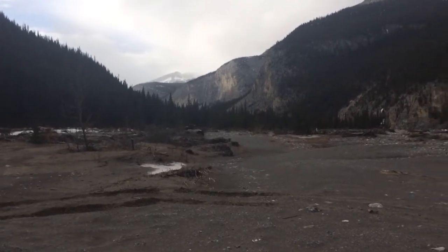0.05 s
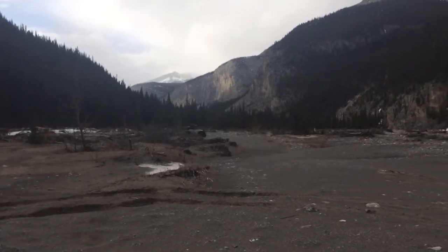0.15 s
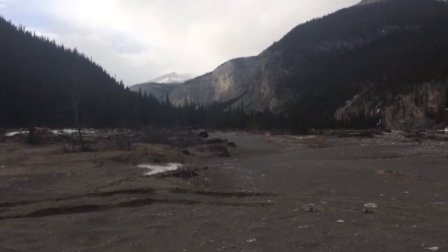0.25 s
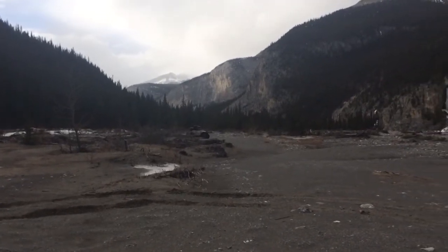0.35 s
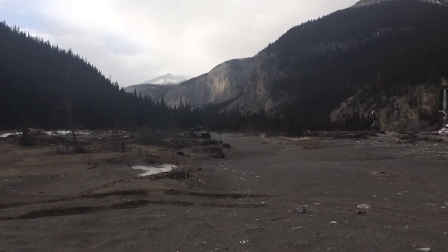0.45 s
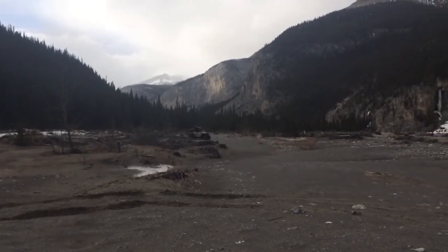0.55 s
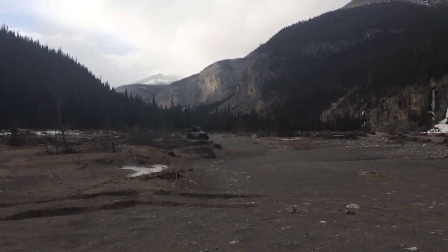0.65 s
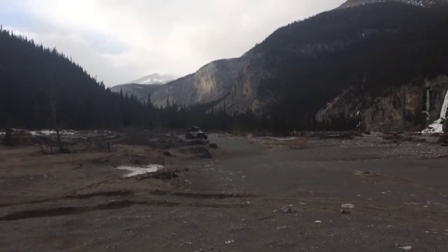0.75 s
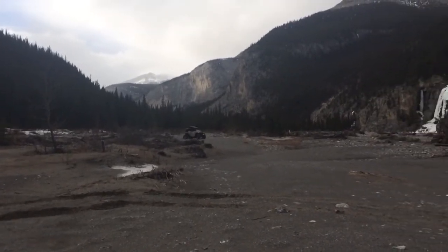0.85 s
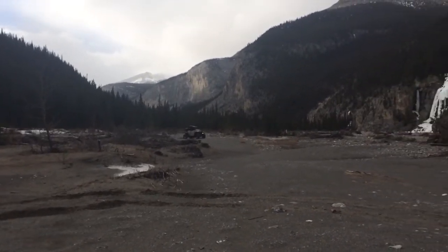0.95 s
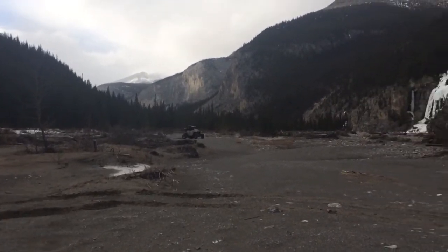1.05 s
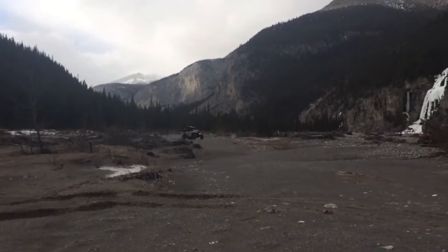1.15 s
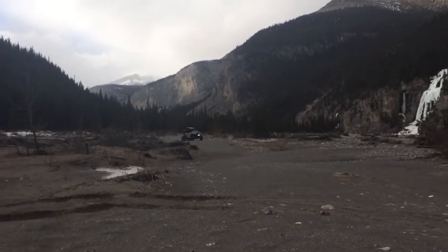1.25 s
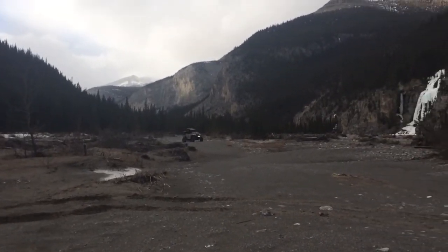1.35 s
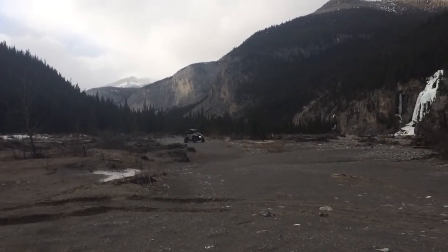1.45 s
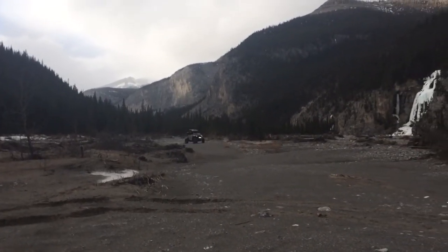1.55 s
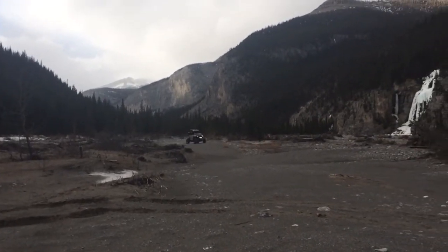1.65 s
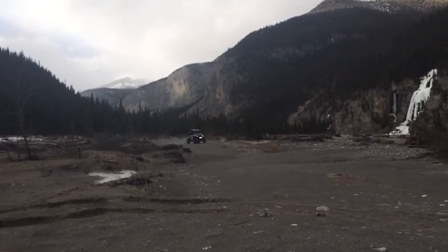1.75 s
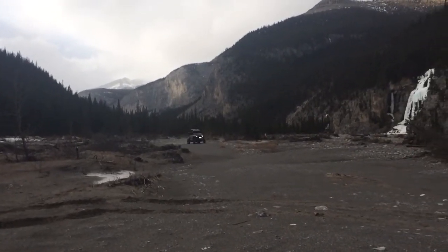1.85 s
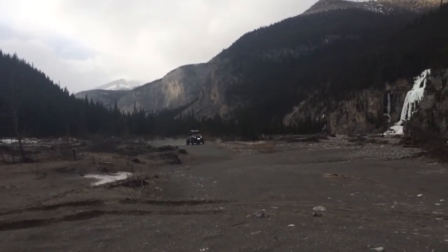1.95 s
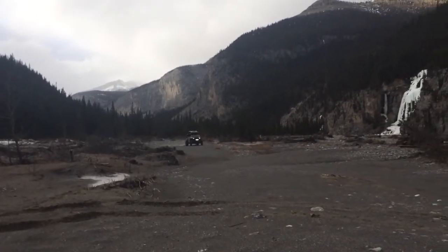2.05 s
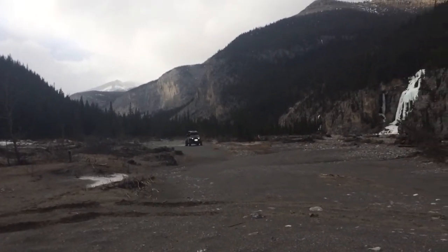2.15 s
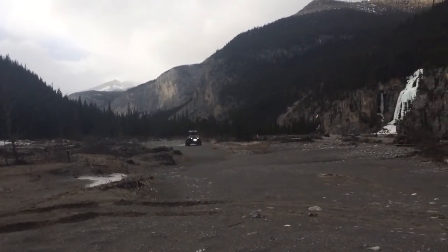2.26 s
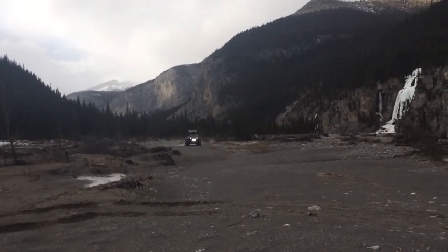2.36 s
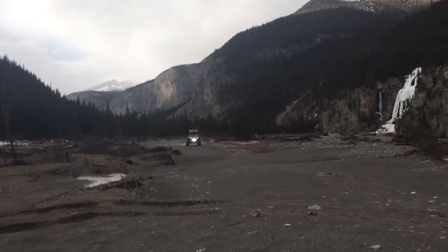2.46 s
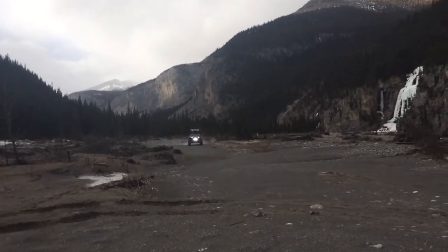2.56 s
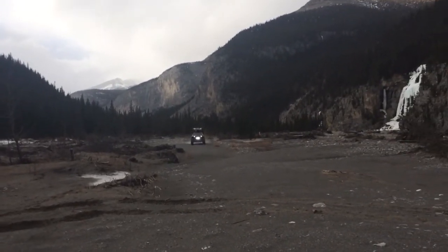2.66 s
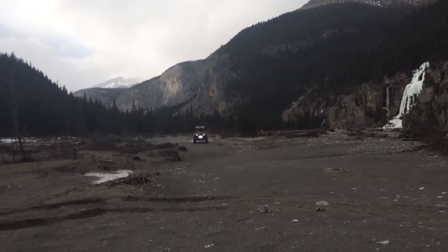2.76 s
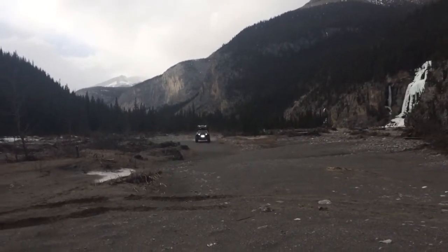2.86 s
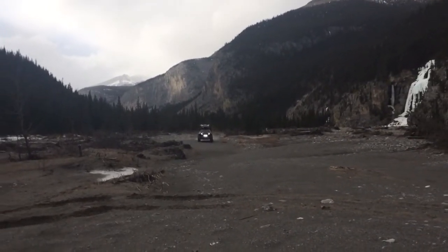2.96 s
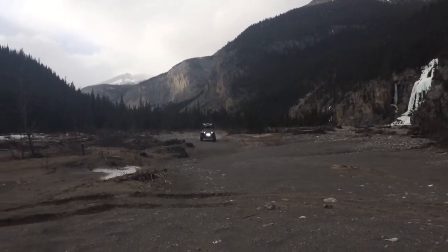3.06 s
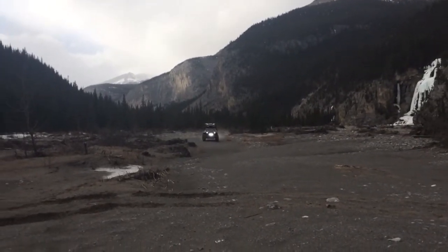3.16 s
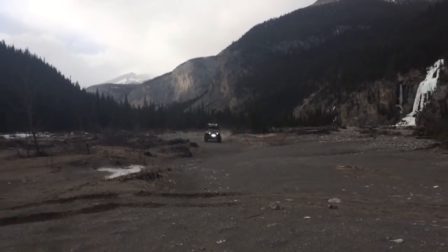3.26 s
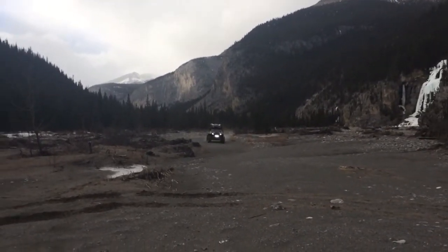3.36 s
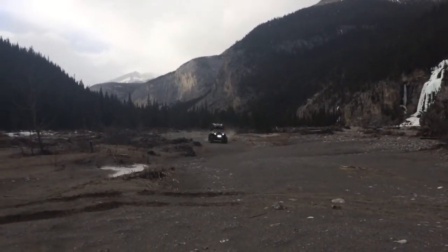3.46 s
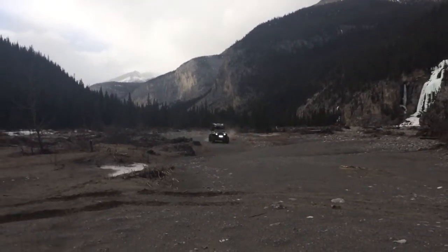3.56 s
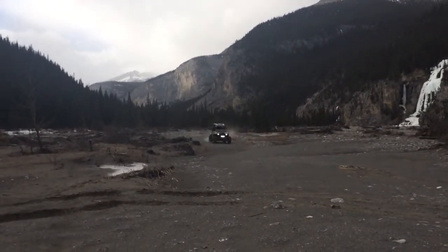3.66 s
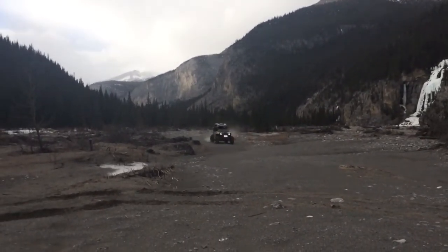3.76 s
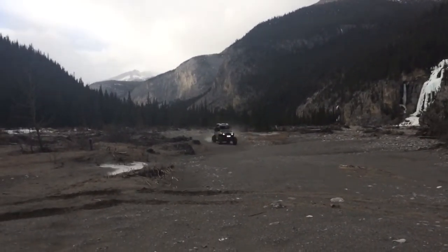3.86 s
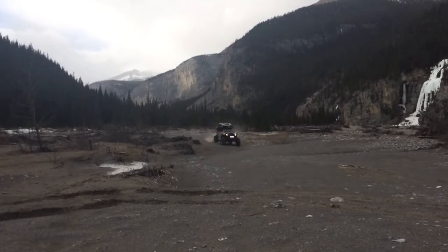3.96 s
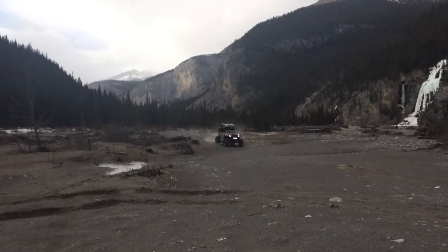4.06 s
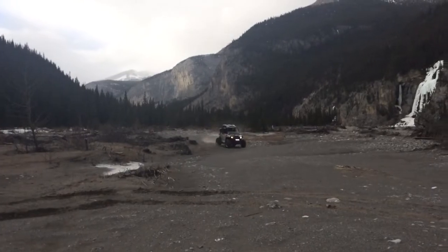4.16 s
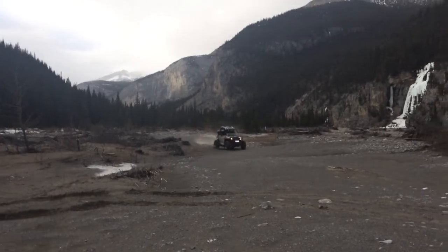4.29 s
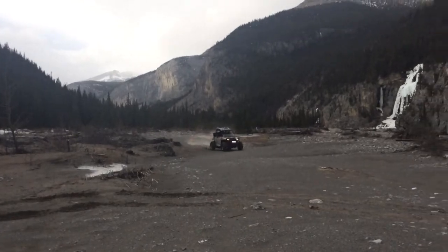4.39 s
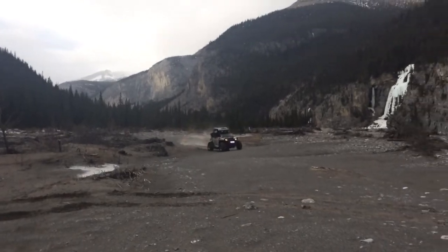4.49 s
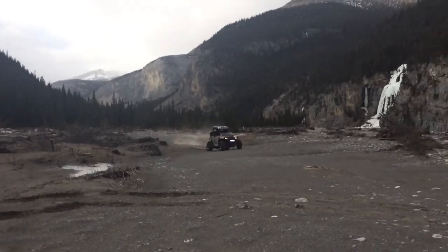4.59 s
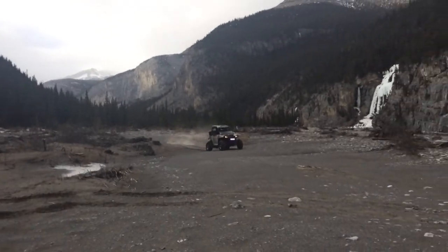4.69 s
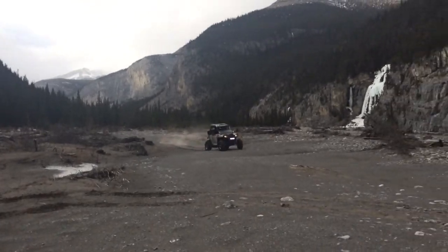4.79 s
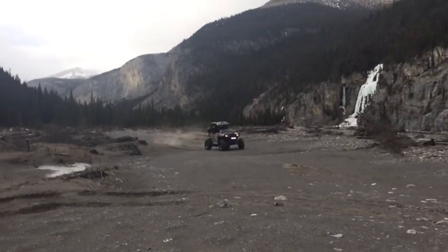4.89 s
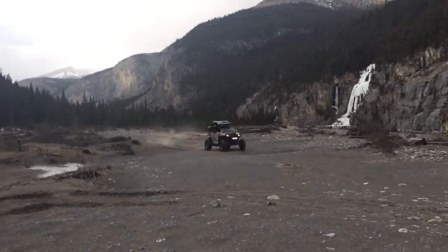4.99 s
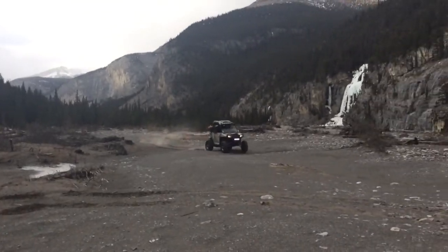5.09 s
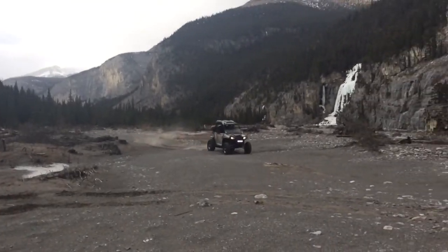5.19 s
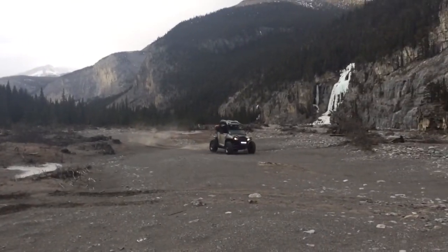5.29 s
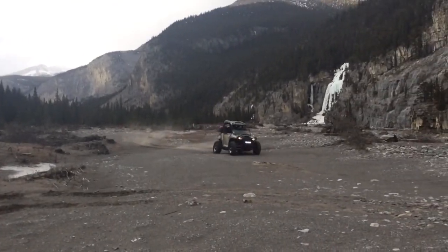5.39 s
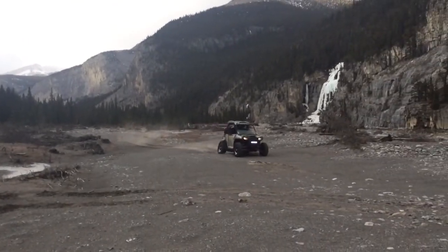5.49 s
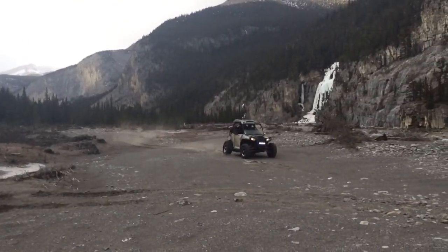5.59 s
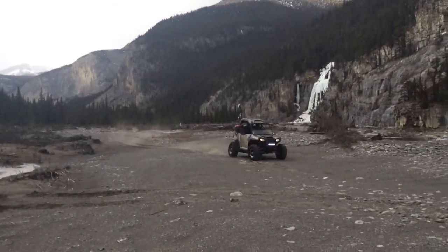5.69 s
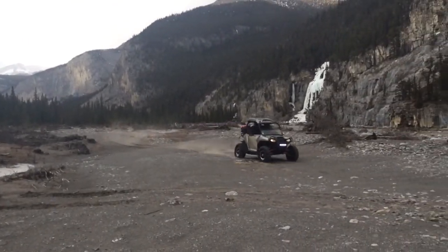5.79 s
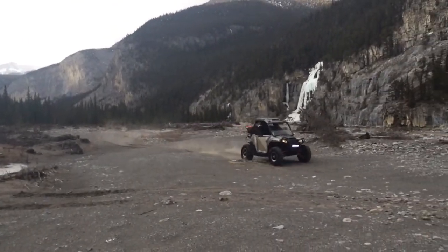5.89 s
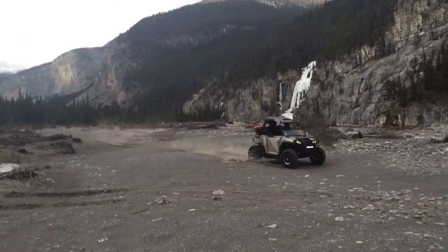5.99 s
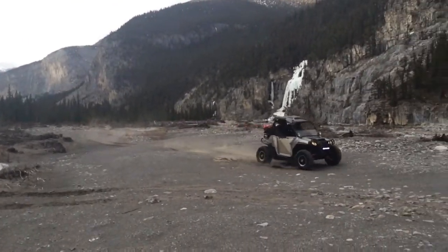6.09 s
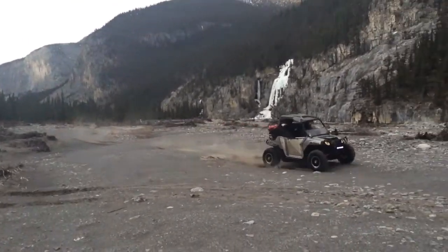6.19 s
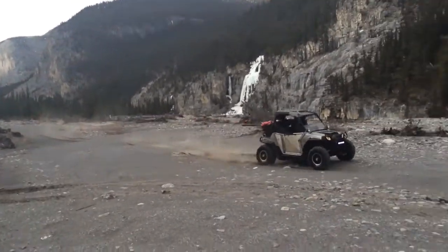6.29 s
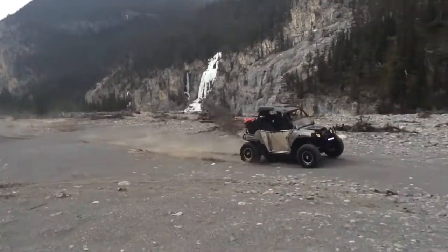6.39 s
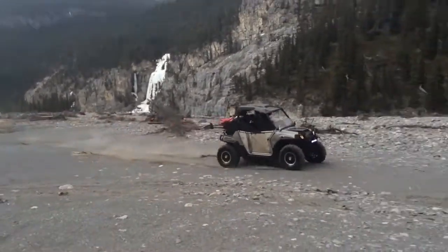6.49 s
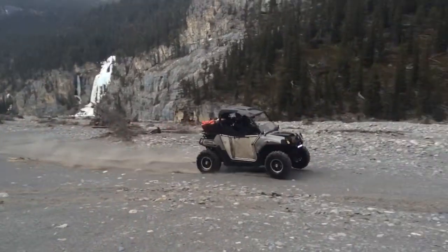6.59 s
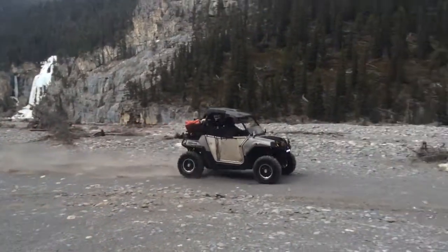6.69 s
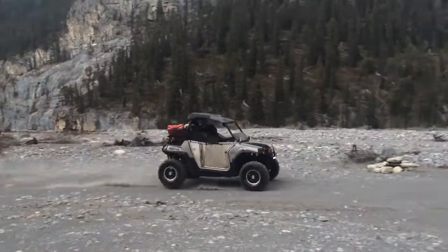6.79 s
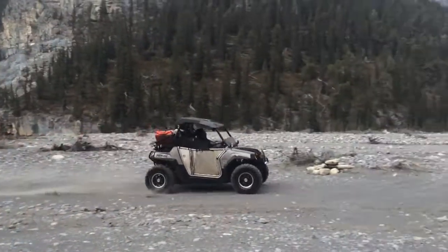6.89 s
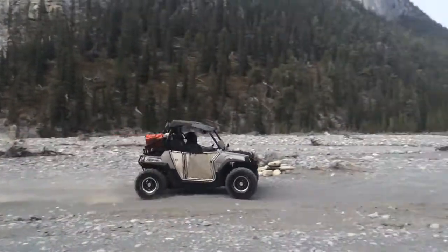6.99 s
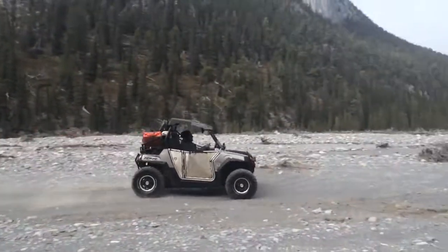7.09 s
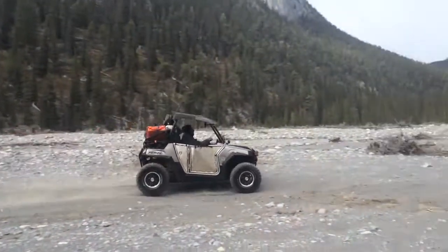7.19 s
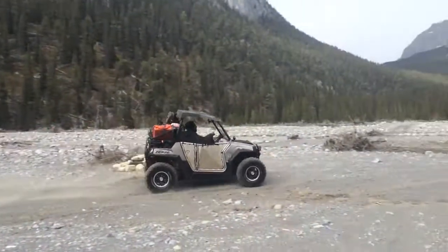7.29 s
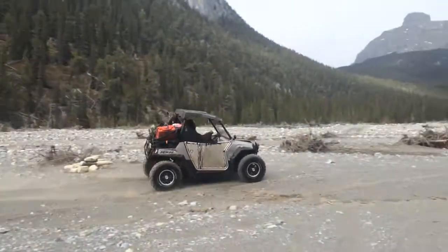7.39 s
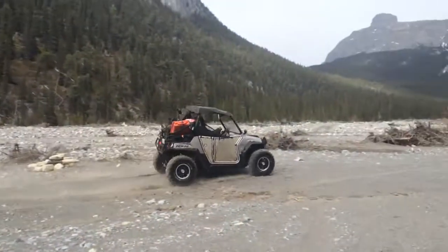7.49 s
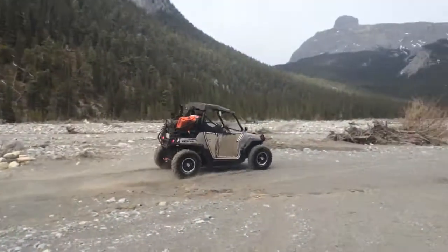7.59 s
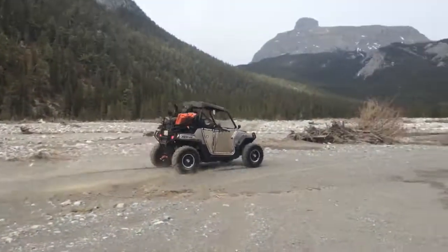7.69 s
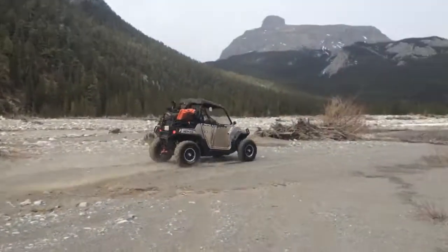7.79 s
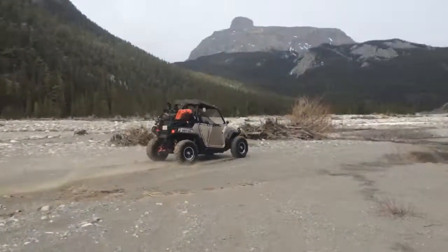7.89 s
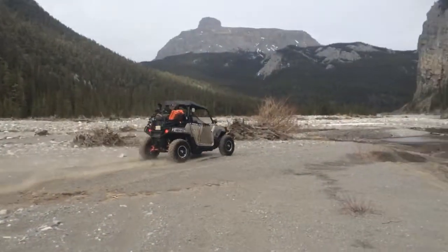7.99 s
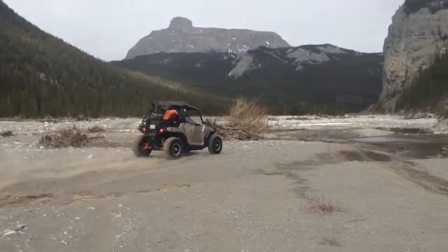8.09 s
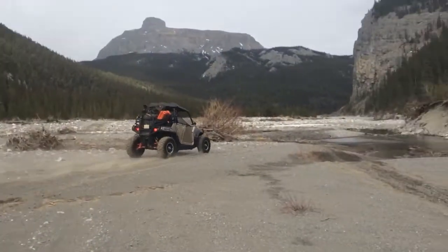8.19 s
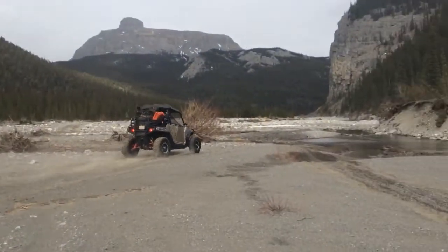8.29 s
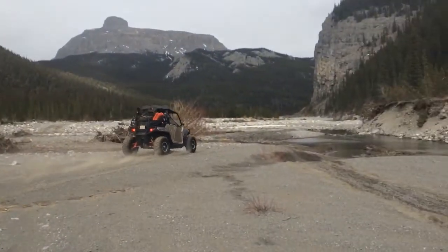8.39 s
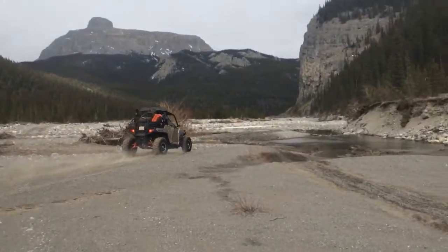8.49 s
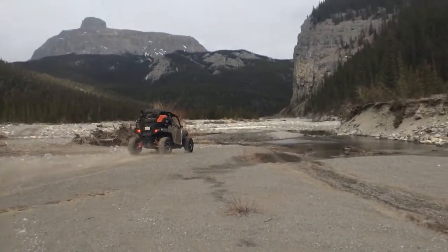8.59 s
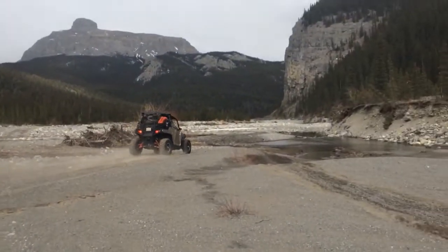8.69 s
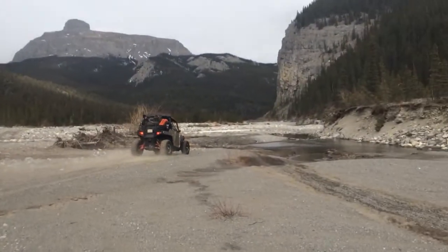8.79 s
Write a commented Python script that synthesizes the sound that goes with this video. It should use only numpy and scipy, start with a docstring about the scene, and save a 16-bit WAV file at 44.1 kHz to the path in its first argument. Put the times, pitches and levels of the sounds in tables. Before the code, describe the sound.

Gusty wind buffets the microphone in an open valley while a distant two-cylinder buggy pulls steadily nearer. Its growling engine swells, with metallic clatter, whining gears and tyres softly crunching gravel. At the close pass the throttle is released and the growl gives way to a deep exhaust boom. One brief rattle follows, and engine and whine sink in pitch as it rolls off, with faint dull echoes.

```python
"""A gravel flat in an open valley: a twin-cylinder buggy nears, passes close and rolls off, throttle shut.
Under load the intake growls as gulps of air ring the airbox; off load the exhaust boom takes over and
the gear whine sinks. The casing clatters, tyres crunch and a bump rattles the chassis. Behind it all,
dull echoes come off the banks and wind buffets the microphone."""
import sys
import numpy as np
from scipy import signal
from scipy.io import wavfile
from scipy.ndimage import uniform_filter1d

SR = 44100
rng = np.random.default_rng(int(sys.argv[2]) if len(sys.argv) > 2 else 0)


def bounce(signal):
    """Save signal as a 16-bit WAV file at the path given by the first command-line argument."""
    frames = np.transpose(np.atleast_2d(signal))
    limited = np.clip(frames, -1, 1)
    pcm = np.round(limited * 32767).astype(np.int16)
    wavfile.write(sys.argv[1], SR, pcm)


N = 390285
TIME = np.arange(N) / SR


# The revs, climbing on the approach and sinking after the pass: time_s, firing_hz
ENGINE_REVS = [(0, 78.4), (.48, 78.4), (.72, 72.4), (1, 84.2), (1.22, 88.8), (1.4, 85), (1.6, 84.4),
               (1.8, 88.2), (2.38, 88.3), (2.6, 92.2), (3.7, 95.9), (4.25, 94.3), (4.45, 97.4), (4.6, 95.2),
               (4.78, 95.2), (4.91, 98), (5.04, 97.2), (5.2, 103.9), (5.43, 104.6), (5.6, 108.4),
               (5.78, 98.3), (6, 103.8), (6.38, 106.4), (6.56, 100), (6.78, 101.9), (6.97, 89.3),
               (7.7, 77.9), (8.05, 69.6), (8.85, 56.6)]

def revs():
    """Firing rate and phase of the slightly unsteady engine, one cycle per firing."""
    firing_hz, = in_time(ENGINE_REVS)
    return firing_hz, 2 * np.pi * np.cumsum(firing_hz * (1 + .00264 * drift(25))) / SR


# A brief lift, a long pull, then shut on passing: time_s, throttle (0-1)
THROTTLE = [(0, 0.33), (.13, 0.86), (.52, 0.84), (.6, 0.25), (1, 0.64), (1.6, 0.98), (4.3, 0.96),
            (5.4, 0.75), (6.78, 0.72), (6.88, 0)]
# The growl swells into a honk: centre_s, depth_db, half_length_s
HONK_SWELLS = [(3.58, 0, 0.59), (4.95, -9, .25), (6.3, 0, 0.22)]
# The growl's low, middle, high and rasp registers: low_hz, high_hz
REGISTERS = [(420, 750), (750, 1000), (1000, 1640), (1640, 2120)]
# Higher registers are breathier: frequency_hz, extra_rush_db
RUSH_TILT = [(570, -8), (860, 0), (1250, 2), (1900, 12)]

def intake_growl(phase, firing_hz, running_db):
    """Gulps of air ring the airbox once per firing; the less throttle, the more they blur into a rush."""
    throttle, = in_time(THROTTLE)
    rush_db = np.interp(throttle, [0, 1], [2, -11])   # air against the firing pulses
    scatter_rad = np.interp(throttle ** 2, [0, 1], [1.15, .221])
    honk = np.minimum(swells(HONK_SWELLS), 1)
    levels_db = register_levels(running_db, honk)
    orders = np.arange(5, 27)
    pulses = 0
    for k, height in zip(orders, airbox(orders, firing_hz, levels_db, honk, rush_db)):
        chirp = .13 * k * k   # the highs arrive first
        pulses -= height * np.cos(k * phase + scatter_rad * (chirp + drift(.79)))
    # the two cylinders differ a little, and no two firings are alike
    growl = pulses * (1 + .041 * np.cos(phase / 2)) * from_db(1.29 * drift(67))
    air = rng.standard_normal(N) * throb(phase + 1, depth=.21)
    for (low, high), level_db in zip(REGISTERS, levels_db):
        rush = from_db(rush_db + at_hz(RUSH_TILT, np.sqrt(low * high)))
        breath = rms_one(band(air, low, high, order=3))
        growl += from_db(level_db) * rush / np.sqrt(1 + rush ** 2) * breath
    return growl


# Fader rides for the growl: time_s, low_register_db, high_register_db
GROWL_LEVELS = [(0, -55, -53), (.5, -56, -50), (.66, -57, -65.5), (.97, -45.5, -42.5), (1.3, -43.5, -47),
                (1.53, -46, -44.5), (1.63, -43.5, -38.5), (1.95, -44.5, -42.5), (2.35, -43, -37.5),
                (2.85, -41, -45), (3.3, -38.5, -44), (4.15, -40, -38.5), (4.45, -34.5, -39.5),
                (4.9, -32, -37), (5.6, -32.5, -36), (6.05, -33, -35.5), (6.3, -37, -37), (6.55, -30.5, -40),
                (6.77, -29.5, -39), (6.87, -38, -41), (8.1, -42.5, -43.5), (8.5, -38, -54),
                (8.85, -40.5, -64)]

def register_levels(running_db, honk):
    """The middle register tracks its neighbours and lifts in a honk; the rasp follows the clatter."""
    low_db, high_db = in_time(GROWL_LEVELS)
    middle_db = (low_db + high_db) / 2 - 2.5 + 6.5 * honk
    rasp_db = -45.5 + .73 * (running_db - running_db.mean())
    return low_db, middle_db, high_db, rasp_db


# Airbox and duct resonances: frequency_hz, gain_db
AIRBOX_EQ = [(300, 5), (420, 6.5), (510, 2), (600, -1), (700, -7.5), (800, -11), (950, -10), (1040, -6),
             (1140, -2.5), (1260, -8), (1400, -6.5), (1510, -12), (1610, -16), (2200, -21.5)]
# Reflections hollow the growl and lift one peak, at full honk: frequency_hz, gain_db
HONK_EQ = [(670, 1.5), (765, -11), (860, 12.5), (950, -10), (1040, -2.5)]

def airbox(orders, firing_hz, levels_db, honk, rush_db, fade_db=4.5):
    """Height of each intake harmonic as it slides through the resonances and slowly fades in and out."""
    coarse = slice(None, None, 200)
    hz = orders[:, None] * firing_hz[coarse]
    fading_db = fade_db * np.array([drift(1.95)[coarse] for k in orders])
    power = from_db(at_hz(AIRBOX_EQ, hz) + honk[coarse] * at_hz(HONK_EQ, hz) + fading_db) ** 2
    scale = 0   # brings each register to its level
    for (low, high), level_db in zip(REGISTERS, levels_db):
        share = 1 / (1 + (low / hz) ** 14 + (hz / high) ** 40)
        scale += share * from_db(level_db[coarse]) ** 2 / np.sum(share * power, axis=0)
    pitched_share = 1 / (1 + from_db(rush_db[coarse] + at_hz(RUSH_TILT, hz)) ** 2)
    heights = np.sqrt(2 * power * scale * pitched_share)
    return [np.interp(TIME, TIME[coarse], height) for height in heights]


# The low end, a thud at the firing rate and a boom an octave up: time_s, thud_db, boom_db
EXHAUST_LEVELS = [(0, -38, -34.5), (.12, -38, -40), (.25, -41, -33), (.9, -55, -31), (1.15, -53, -40.5),
                  (1.55, -43, -32.5), (1.72, -50, -45.5), (2.3, -43, -38.5), (3.5, -36.5, -44.5),
                  (3.9, -36.5, -55), (4.7, -38, -38.5), (6.2, -34.5, -41.5), (6.72, -28.5, -31.5),
                  (6.88, -27.5, -27), (7.4, -27, -28.5), (7.82, -32, -21), (8.35, -40, -24.5),
                  (8.85, -39.5, -23.5)]
# The fourth harmonic, a drone that comes and goes: time_s, level_db
DRONE_LEVEL = [(0, -60), (1, -49.5), (2.4, -48.5), (2.85, -38.5), (3.5, -36), (3.75, -47.5), (4.25, -51),
               (4.43, -35.5), (5.3, -39.5), (5.8, -34), (6.55, -33.5), (6.85, -47), (7.5, -42), (8.85, -39)]

def exhaust(phase, firing_hz, waver_db=1.5, muffler_hz=297.3, open_ground_s=2.3):
    """The muffler lets out only four harmonics and smears each pulse in time."""
    thud_db, boom_db = in_time(EXHAUST_LEVELS)
    drone_db, = in_time(DRONE_LEVEL)
    # the third harmonic ducks above the muffler's edge, and rough ground shades it until the open flat
    muffled_db = 10 / (1 + (muffler_hz / firing_hz / 3) ** 80)
    shaded_db = 16 * np.maximum(1 - TIME / open_ground_s, 0)
    third_db = thud_db - 1.5 - muffled_db - shaded_db
    pulses = 0
    for k, level_db in enumerate([thud_db, boom_db, third_db, drone_db], 1):
        smear_rad = .5 * (k - 1) ** 2
        pulses -= np.sqrt(2) * from_db(level_db + waver_db * drift(5.7)) * np.cos(k * phase + smear_rad)
    return pulses


# The casing's metallic ring: frequency_hz, gain_db
CASING_EQ = [(2100, -44.5), (2300, -6), (2600, -4), (2950, 1.5), (3250, -1), (3450, -6), (3700, -12),
             (4050, -14.5), (4500, -24.5)]

def clatter(phase, level_db):
    """Valves and clutch shake the casing, which rings near 3 kHz, in step with the firings."""
    ring = noise(CASING_EQ, bands=16)
    return from_db(level_db + .8 * drift(18)) * ring * throb(phase, depth=.3)


# Transmission whine, riding up and down with road speed: time_s, pitch_hz, relative_db
GEAR_WHINE = [(3.6, 2760, -20), (4, 2920, -6), (4.45, 3040, -3.5), (5.2, 3170, -6), (5.7, 3310, -13),
              (6.7, 3300, -6), (7.12, 2990, -1), (7.35, 2840, -11), (7.58, 2680, -4), (7.8, 2530, -11),
              (8.17, 2290, -1), (8.35, 2080, -14), (8.55, 1870, -2), (8.85, 1640, -9)]

def gears(running_db, blur_hz=72, flare_db=2):
    """Meshing teeth sing a blurred note that flares up at random."""
    pitch_hz, relative_db = in_time(GEAR_WHINE)
    mesh = 2 * np.pi * np.cumsum(pitch_hz) / SR
    gain = from_db(running_db + relative_db + flare_db * drift(9.1))
    return gain * (drift(blur_hz) * np.cos(mesh) + drift(blur_hz) * np.sin(mesh))


# Sandy hiss of the tread: frequency_hz, gain_db
SAND_EQ = [(4500, 3.5), (5200, -1.5), (6000, -6.5), (7000, -12.5), (8000, -19.5), (10000, -20.5),
           (12000, -29), (15500, -32)]
# Low drumming of tyres on gravel: frequency_hz, gain_db
DRUM_EQ = [(120, 4), (200, -8), (330, -8), (450, -5)]
# Sprays of grit off the rear tyres: centre_s, level_db, half_length_s
GRIT_SPRAYS = [(6.68, -71, .15), (8.17, -71, 0.25), (8.48, -71, 0.096)]

def tyres(level_db, crunch_db=-15.5, drum_db=16.5):
    """Sand hisses under the tread, stones click, the carcass drums and grit is flung back."""
    crunch = from_db(crunch_db) * stones(per_s=430, low_hz=3000, high_hz=9000)
    drum = from_db(drum_db) * noise(DRUM_EQ, bands=3)
    grit = swells(GRIT_SPRAYS) * stones(per_s=1300, low_hz=5000, high_hz=13000)
    return from_db(level_db) * (noise(SAND_EQ, bands=8) + crunch + drum) + grit


def stones(per_s, low_hz, high_hz):
    """Stones of random size click at random moments; rms 1."""
    sizes = from_db(4.5 * np.minimum(rng.exponential(1, N), 4)) * rng.choice([-1, 1], N)
    hits = rng.random(N) < per_s / SR
    return rms_one(band(sizes * hits + 1e-18, low_hz, high_hz))


# One jolt just after the pass: centre_s, level_db, half_length_s
BUMPS = [(7.385, -33.5, .014)]
# The chassis's hollow clank: frequency_hz, gain_db
CHASSIS_EQ = [(300, -11), (550, 6), (900, -7), (1900, 3), (4000, -40), (9000, -45)]

def chassis():
    """The chassis rattles briefly over a bump."""
    return swells(BUMPS) * noise(CHASSIS_EQ, bands=7)


def valley(buggy, echo_db=-23, delays_s=(.093, .217, .38)):
    """Faint dull echoes come back from the banks and the cliff."""
    dull = band(buggy, 210, 2200, order=1)
    return from_db(echo_db) * sum(np.interp(TIME - delay, TIME, dull, left=0) for delay in delays_s)


# Fader ride for the wind bed: time_s, level_db
WIND_LEVEL = [(0, -43.5), (1.6, -39), (2.5, -43), (4.3, -39.5), (5.2, -43), (6.2, -41), (6.75, -35),
              (7.15, -47), (7.8, -37.5), (8.85, -36.5)]
# The bed's deep rumble: frequency_hz, gain_db
WIND_EQ = [(25, -20.5), (40, -6.5), (65, -1), (110, -4), (170, -7.5), (260, -33), (420, -17.5)]
# Single gusts: centre_s, level_db, half_length_s
GUSTS = [(.93, -32, 0.048), (1.03, -35, 0.027), (1.11, -34, 0.012), (1.27, -41, 0.016), (1.615, -25, 0.029),
         (1.84, -30, 0.015), (1.93, -34.5, 0.034), (2.13, -36.5, 0.018), (2.88, -36.5, 0.025),
         (4.4, -35, 0.023), (6.83, -24, 0.043)]
# A gust's soft thump: frequency_hz, gain_db
GUST_EQ = [(30, -18), (65, -4), (120, 6.5), (180, -6.5), (260, -20.5), (420, -28)]

def wind(swing_db=2.4):
    """Wind buffets the microphone port: a lumpy rumble with a few harder gusts."""
    level_db, = in_time(WIND_LEVEL)
    bed = from_db(level_db + swing_db * drift(8.4)) * noise(WIND_EQ, bands=7)
    return bed + swells(GUSTS) * evened(noise(GUST_EQ, bands=6))


# Two tiny accents: start_s, level_db, decay_s
TICKS = [(2.414, -49.5, .003), (2.872, -60, 0.0034)]
# Their bright edge: frequency_hz, gain_db
TICK_EQ = [(2500, -12), (4500, 3), (7000, -15), (14000, -15)]

def ticks():
    """Close, dry clicks that snap on and die away."""
    envelope = sum(from_db(db) * (TIME >= start_s) * np.exp(-np.abs(TIME - start_s) / decay_s)
                   for start_s, db, decay_s in TICKS)
    return envelope * noise(TICK_EQ, bands=5)


def from_db(db):
    """Decibels to gain."""
    return 10 ** (db / 20)


def rms_one(x):
    """Scale to unit power."""
    return x / np.sqrt(np.mean(x ** 2) + 1e-20)


def evened(x):
    """Hold the running power at 1."""
    return x / np.sqrt(np.abs(uniform_filter1d(x ** 2, size=4000)) + 1e-12)


def in_time(rows):
    """Each column of an automation curve, sample by sample."""
    time_s, *columns = np.transpose(rows)
    return [np.interp(TIME, time_s, column) for column in columns]


def at_hz(eq, hz):
    """Read an EQ curve in dB on a log-frequency axis."""
    centres, db = np.transpose(eq)
    return np.interp(np.log(hz), np.log(centres), db)


def drift(rate_hz):
    """A smooth random wobble of spread 1."""
    step, settle = 40, 2000
    pole = np.exp(-2 * np.pi * rate_hz * step / SR)
    white = rng.standard_normal(N // step + settle + 2)
    slow = signal.lfilter([1], [1, -2 * pole, pole ** 2], white)[settle:]
    return np.interp(np.arange(N) / step, np.arange(len(slow)), rms_one(slow))


def band(x, low_hz, high_hz, order=2):
    """Butterworth band-pass."""
    return signal.sosfilt(signal.butter(order, [low_hz, high_hz], "band", fs=SR, output="sos"), x)


def noise(eq, bands):
    """Noise coloured by an EQ curve; rms 1."""
    edges = np.geomspace(eq[0][0], eq[-1][0], bands + 1)
    white = rng.standard_normal((2, N))
    return rms_one(sum(from_db(at_hz(eq, np.sqrt(low * high))) * band(white[k % 2], low, high)
                       for k, (low, high) in enumerate(zip(edges, edges[1:]))))


def swells(rows):
    """Bell-shaped envelopes, one for each event."""
    return sum(from_db(db) * np.exp(-.5 * ((TIME - centre_s) / half_s) ** 2)
               for centre_s, db, half_s in rows)


def throb(phase, depth):
    """A gain that peaks once per firing."""
    return rms_one(np.exp(depth * np.cos(phase)))


# Group fader for clatter, gears and tyres, rising as the buggy nears: time_s, level_db
RUNNING_LEVEL = [(0, -51), (.72, -56.5), (.86, -48), (1.18, -44.5), (1.4, -52), (2.3, -51), (3.7, -51.5),
                 (4.4, -42), (5.15, -38.5), (5.6, -37), (5.8, -39.5), (6.15, -33), (6.8, -31.5),
                 (6.97, -34), (7.45, -33), (8.85, -39.5)]

def scene():
    """The mono mix: the buggy up front, then its echoes, wind, ticks and a faint hiss."""
    firing_hz, phase = revs()
    running_db, = in_time(RUNNING_LEVEL)
    intake = intake_growl(phase, firing_hz, running_db)
    engine = intake + exhaust(phase, firing_hz) + clatter(phase, running_db - 1.4)
    buggy = engine + gears(running_db) + tyres(running_db - 22.5) + chassis()
    hiss = from_db(-80.5) * rng.standard_normal(N)
    return (buggy + valley(buggy) + wind() + ticks() + hiss)[None]


def record(dry):
    """A 5 ms fade-in and a steep high cut."""
    fade_in = np.minimum(TIME / .005, 1)
    high_cut = signal.ellip(10, .1, 80, 15150, fs=SR, output="sos")
    return signal.sosfilt(high_cut, dry * fade_in)


dry = scene()
out = record(dry)
bounce(out)
```